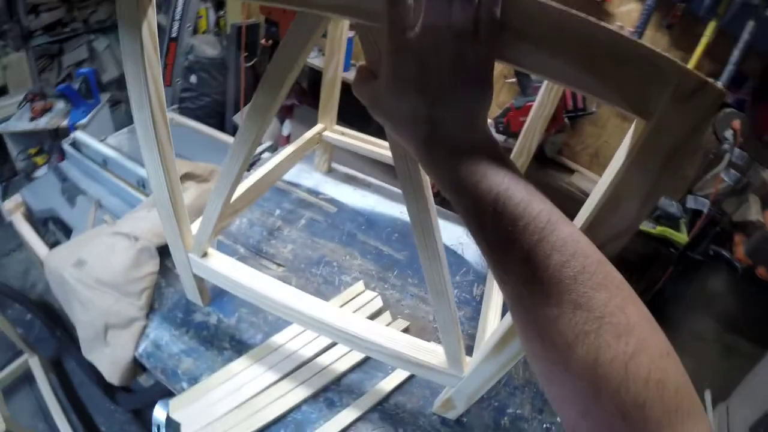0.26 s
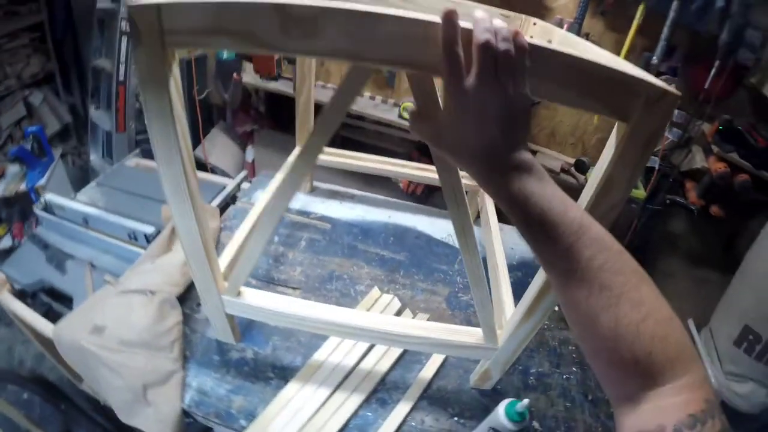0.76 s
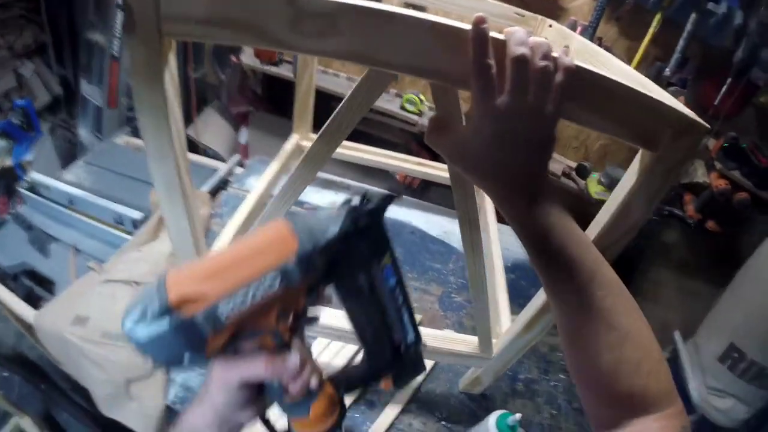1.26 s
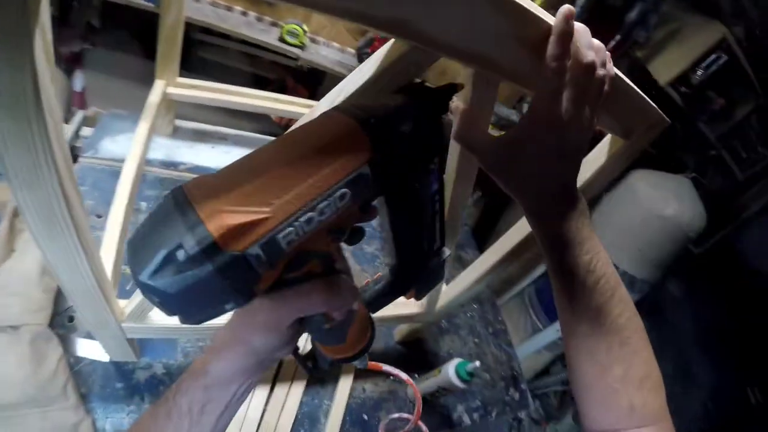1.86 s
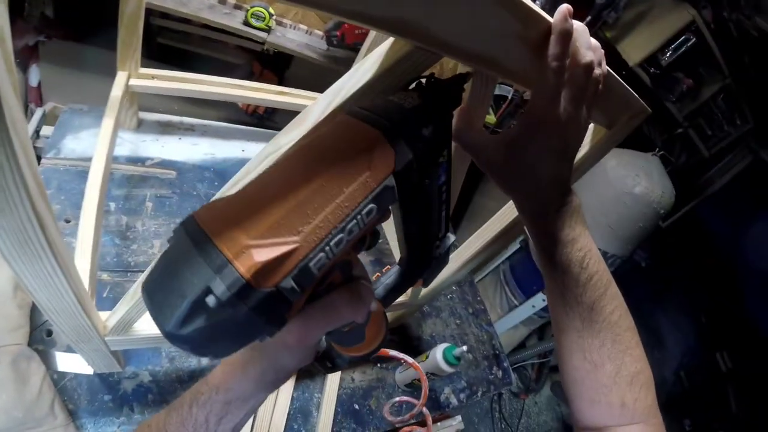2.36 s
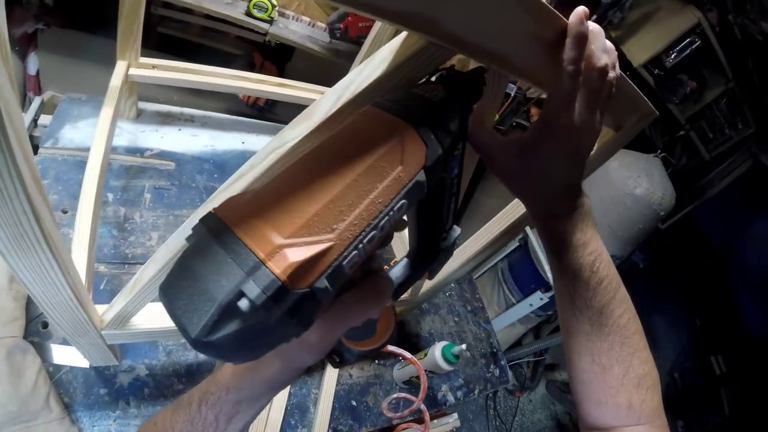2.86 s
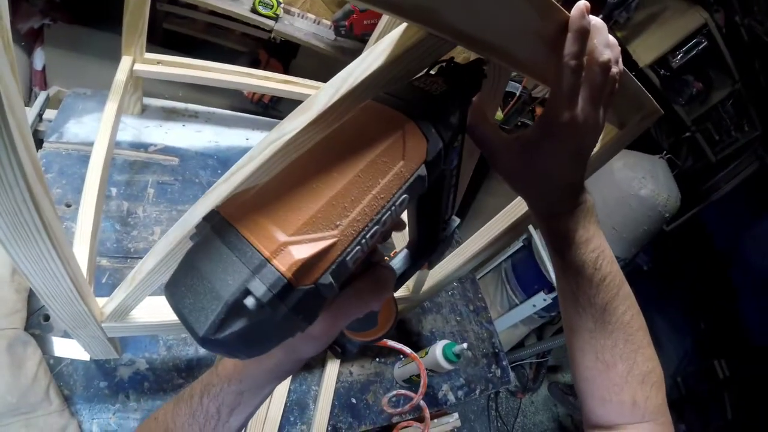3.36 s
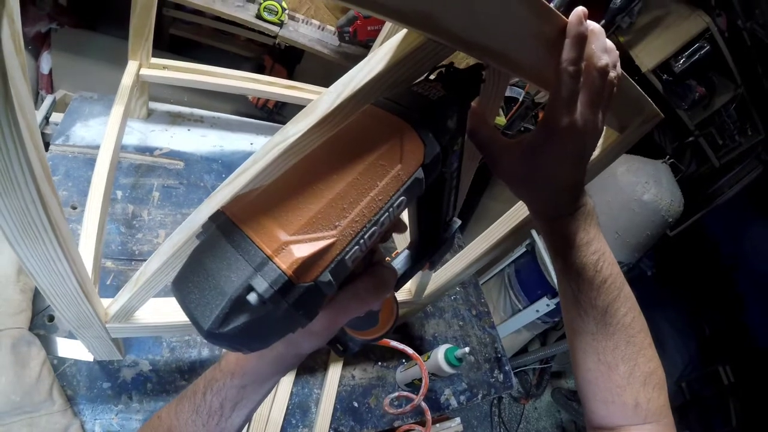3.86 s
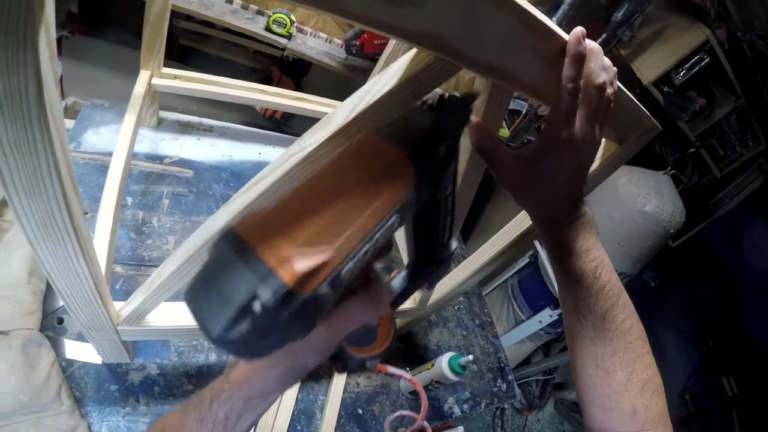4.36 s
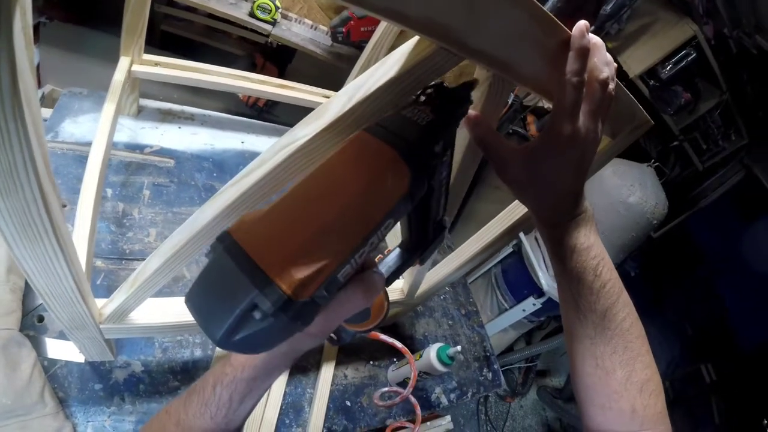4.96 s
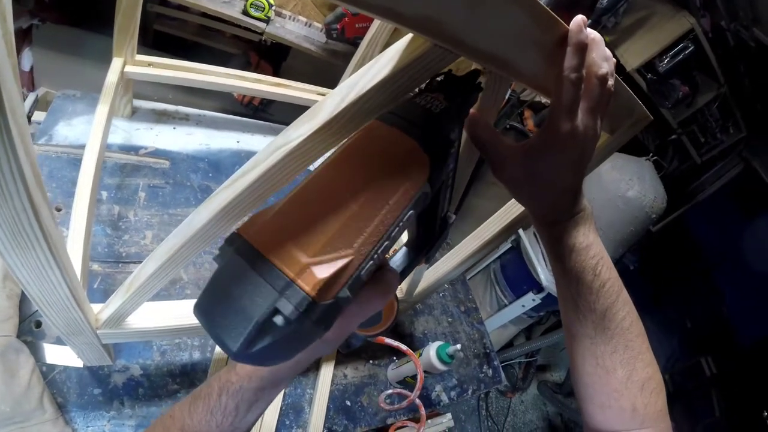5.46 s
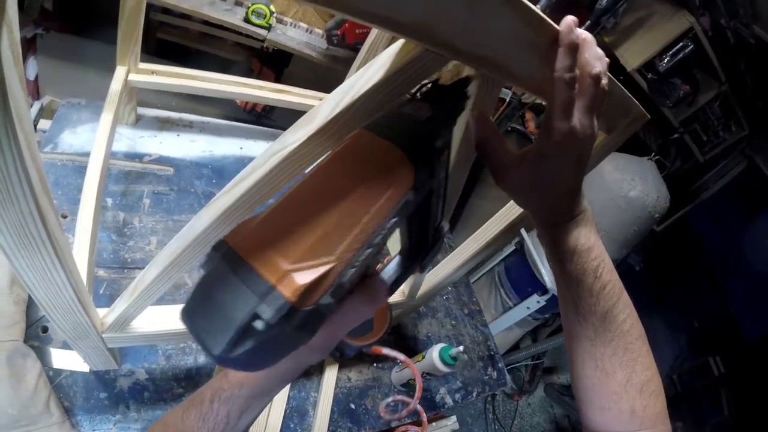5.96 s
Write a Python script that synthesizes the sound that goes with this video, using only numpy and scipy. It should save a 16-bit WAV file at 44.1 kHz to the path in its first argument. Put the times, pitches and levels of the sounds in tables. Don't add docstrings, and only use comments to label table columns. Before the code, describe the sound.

Quiet rubbing and ticks on a wooden frame, a sudden cracking brad nailer shot with chattering exhaust, then sparse metallic clicks over subdued rumble.

```python
import sys
import numpy as np
from scipy import signal
from scipy.fft import rfft, irfft, next_fast_len
from scipy.io import wavfile
from scipy.ndimage import map_coordinates

SR = 44100
rng = np.random.default_rng(int(sys.argv[2]) if len(sys.argv) > 2 else 0)


def attenuation_scalar(level_db):
    decades = np.asarray(level_db, float) / 20
    return 10 ** decades


def transcribe(signal):
    frames = np.atleast_2d(signal).T
    limited = np.clip(frames, -1, 1)
    pcm = np.round(limited * 32767).astype(np.int16)
    wavfile.write(sys.argv[1], SR, pcm)


N = 273420


def unit(x):
    return x / np.sqrt(np.mean(x ** 2) + 1e-20)


def along(points, hz):
    point_hz, value = np.transpose(points)
    return np.interp(np.log(hz + 1), np.log(point_hz + 1), value)


def wobble(rate_hz):
    knots = rng.standard_normal(int(N * rate_hz / SR) + 4)
    return map_coordinates(knots, [np.arange(N) * rate_hz / SR])


def filtered(x, response):
    size = next_fast_len(N)
    gain = attenuation_scalar(along(response, np.fft.rfftfreq(size, 1 / SR)))
    return irfft(rfft(x, size) * gain, size)[:N]


def noise(spectrum):
    return unit(filtered(rng.standard_normal(next_fast_len(N)), spectrum))


def ring(modes, t, scatter_db, shorten=1):
    total = 0
    for hz, db, t60 in modes:
        decay = attenuation_scalar(db + rng.normal() * scatter_db - 60 * t / (t60 * shorten))
        total = total + decay * np.sin(2 * np.pi * hz * t)
    return total


def add(track, start_s, sound):
    part = track[round(start_s * SR):][:len(sound)]
    part += sound[:len(part)]


def bursts(rows, bright_colour, dull_colour, rise_s, flutter_db):
    t = np.arange(SR // 2) / SR
    bright_power, dull_power = np.zeros(N), np.zeros(N)
    for start_s, db, hold_s, t60, dull_db in rows:
        fall_db = 60 * np.clip(t - rise_s - hold_s, 0, 1) / t60
        flow = np.clip(t / rise_s, 0, 1) ** 2 * attenuation_scalar(db - fall_db)
        add(bright_power, start_s, flow ** 2)
        add(dull_power, start_s, (attenuation_scalar(dull_db) * flow) ** 2)
    flutter = unit(attenuation_scalar(flutter_db * wobble(500)))
    bright = np.sqrt(bright_power) * noise(bright_colour)
    return flutter * (bright + np.sqrt(dull_power) * noise(dull_colour))


# start_s [s], level_db [dB rms], hold_s [s], t60_s [s], dull_db [dB]
INLET = [
    (4.0665, -12, 0.00088, 0.023, -7.5),
    (4.0645, -18, 0.04, .03, -12),
]
# start_s [s], level_db [dB rms], hold_s [s], t60_s [s], dull_db [dB]
STRIKE = [
    (4.0975, -15.5, 0.0011, 0.018, 0),
    (4.0995, -12, 0.0032, 0.01, -1.8),
    (4.104, -22.5, 0.0034, 0.014, -2),
]
# start_s [s], level_db [dB rms], hold_s [s], t60_s [s], dull_db [dB]
EXHAUST = [
    (4.104, -33, .005, 0.24, -0.5),
    (4.2238, -29, .004, .03, -11),
    (4.229, -24.5, .002, .025, -11.5),
    (4.2443, -9, 0.01, .06, -12.5),
    (4.26, -25, 0.009, .25, -14.5),
    (4.275, -29.5, 0.0038, 0.021, 0.5),
    (4.29, -43, 0.071, 0.14, -14),
]
# pitch_hz [Hz], level_db [dB per Hz]
NOZZLE = [(2710, -39.5), (4600, -16), (5540, -3), (9960, -0.5), (11300, -13), (14500, -26), (15300, -32),
          (15700, -51)]
# pitch_hz [Hz], level_db [dB per Hz]
CYLINDER = [(350, -46), (600, -18.5), (1670, -13.5), (1810, -3), (2050, -15), (2260, 3), (2760, -10.5),
            (3530, -6), (4300, -19), (5590, -45.5), (9460, -120)]
# pitch_hz [Hz], level_db [dB per Hz]
WOOD = [(290, -32.5), (500, -2), (1670, -10.5), (2130, -14.5), (2660, -5.5), (3110, -12), (4600, -22),
        (5980, -46), (10100, -120)]
# pitch_hz [Hz], level_db [dB per Hz]
BRIGHT = [(2060, -47.5), (3500, -15), (4250, -20.5), (5570, -5.5), (6170, -7), (7680, 1), (10100, -9),
          (10600, -16), (11700, -29), (14300, -28), (15700, -36)]
# pitch_hz [Hz], level_db [dB per Hz]
DULL = [(290, -34), (500, -3), (554, -5.5), (642, -7.5), (1200, -3.5), (1920, -8.5), (2590, -4),
        (3510, -13), (4600, -35.5), (5980, -43.5), (10100, -120)]


def air():
    fill = bursts(INLET, NOZZLE, CYLINDER, rise_s=0.0032, flutter_db=1.5)
    strike = bursts(STRIKE, NOZZLE, WOOD, rise_s=0.0011, flutter_db=1.0)
    exhaust = bursts(EXHAUST, BRIGHT, DULL, rise_s=0.0047, flutter_db=0.9)
    return fill + strike + exhaust


# start_s [s], level_db [dB peak], contact_s [s], ring_length [0-1]
BLOWS = [
    (4.067, -15, 0.0019, 0.86),
    (4.0993, -4, 0.00078, 0.4),
    (4.1116, -14.5, .002, 0.5),
    (4.1215, -13.5, .002, .6),
    (4.152, -22.5, .002, .8),
    (4.182, -26, .0025, .9),
    (4.2338, -20.5, .002, .15),
    (4.2444, -7.5, .0009, .15),
]
# start_s [s], level_db [dB peak]
BUMPS = [(.68, -37), (.7, -32.5), (.995, -35.5), (1.145, -38), (1.245, -40), (1.745, -31.5), (1.76, -34),
         (1.8, -37), (1.825, -38.5), (4.859, -33.5), (4.89, -39.5), (4.93, -42), (5.295, -37),
         (5.345, -38.5), (5.385, -39.5), (5.555, -37), (5.745, -39), (6.155, -34.5)]
# pitch_hz [Hz], level_db [dB], t60_s [s]
FRAME = [(166, 0, 0.14), (218, -0.5, 0.14), (266, 2.5, 0.052), (311.3, -8.5, 0.13), (391.5, -4, .15),
         (540, -17, .03), (960, -16, 0.025)]


def frame():
    out, t = np.zeros(N), np.arange(SR // 3) / SR
    chatter = [(4.2558 + k * 0.0112, -8 - 2.1 * k ** 2, 0.002, 0.46) for k in range(6)]
    bumps = [(start_s, db, 0.0014, 0.7) for start_s, db in BUMPS]
    for start_s, db, contact_s, ring_length in BLOWS + chatter + bumps:
        push = np.hanning(int(contact_s * SR) + 3)
        ringing = np.convolve(ring(FRAME, t, 1.5, ring_length), push / push.sum())
        add(out, start_s + contact_s / 2, attenuation_scalar(db - 8.5) * ringing)
        add(out, start_s, -attenuation_scalar(db - 7.5) * push)
    return out


# start_s [s], level_db [dB peak], dull_db [dB], steel_hz [Hz], housing_hz [Hz]
CLICKS = [(0.0955, -30, -11, 7040, 931), (0.108, -32, -19, 6500, 1540), (2.0072, -33, -6, 4900, 1700),
          (2.2775, -28.5, -1, 9600, 1570), (2.2867, -37, 8, 4400, 930), (2.569, -40, -4.5, 6830, 2270),
          (2.6475, -22.5, -21, 8600, 2200), (2.654, -32, -25, 8450, 2200), (3.9238, -42, 6.5, 7800, 920),
          (4.6187, -30, -4, 8500, 897), (4.8619, -28.5, -3, 8540, 2693), (5.0504, -22.5, -6.5, 7900, 2564),
          (5.8895, -15.5, -1.5, 5600, 2800), (5.9618, -16.5, -7, 8010, 2200),
          (5.9684, -37, 1.5, 7580, 2190), (6.1605, -38, -0.5, 6700, 1360)]
# start_s [s], level_db [dB peak], dull_db [dB]
TICKS = [(.9756, -42, 3.5), (1.7495, -51, 13), (1.7928, -41, -14), (1.9016, -42, -21),
         (2.1172, -40.5, -0.5), (2.369, -56, 9), (2.445, -58, 9), (2.6728, -46, 0), (2.994, -41.5, -6),
         (4.0125, -50, 0), (4.042, -35, -10), (5.257, -50, -12), (5.2942, -46, 4), (5.308, -52, 8),
         (5.3687, -46, -9.5), (5.556, -53, 8), (5.7444, -52, 9)]
# start_s [s], level_db [dB peak], dull_db [dB]
RATTLES = [
    (4.6297, -36, -3),
    (4.872, -43, 3),
    (5.047, -45, 2),
    (5.8846, -29.5, -8),
    (5.903, -40, 7),
]
# pitch_hz [Hz], level_db [dB], t60_s [s]
METAL = [(5280, -6, .02), (6830, -2, 0.045), (7350, -11, .03), (8450, -3.5, 0.04), (9800, -6, 0.024)]
# pitch_hz [Hz], level_db [dB], t60_s [s]
BODY = [(955, -2, 0.024), (1620, 3.5, 0.013), (2190, 0.5, 0.026), (2870, 4.5, 0.017), (3380, 0.5, 0.013),
        (4240, -1.5, .012)]


def clicks():
    out, t = np.zeros(N), np.arange(SR // 6) / SR
    bright, dull = noise(BRIGHT), noise(DULL)
    onset = np.clip(t / 0.001, 0, 1) ** 2
    contacts = [(0.021, *row) for row in CLICKS]
    for t60, rows in ((0.018, TICKS), (0.033, RATTLES)):
        contacts += [(t60, *row, rng.uniform(6500, 9100), rng.uniform(900, 2760)) for row in rows]
    for t60, start_s, db, dull_db, steel_hz, housing_hz in contacts:
        crack = 0.46 * attenuation_scalar(-60 * t / 0.0038) + attenuation_scalar(-60 * t / t60) + 0.1 * attenuation_scalar(-60 * t / (4 * t60))
        at = rng.integers(N - len(t))
        steel_ring = ring(METAL + [(steel_hz, 8, .03)], t, 2.5, shorten=t60 / 0.045)
        housing_ring = ring(BODY + [(housing_hz, 6, .018)], t, 1.0, shorten=t60 / 0.017)
        steel = crack * bright[at:at + len(t)] + 0.45 * steel_ring
        housing = crack * dull[at:at + len(t)] + 0.46 * housing_ring
        add(out, start_s + .0004, attenuation_scalar(db - 6) * onset * (steel + attenuation_scalar(dull_db) * housing))
    return out


# peak_s [s], level_db [dB peak], swell_s [s], fade_s [s], dull_db [dB]
SCUFFS = [(.055, -47, 0.028, 0.11, -21), (0.104, -40.5, 0.11, 0.073, -5), (.256, -48, 0.027, 0.17, 0),
          (.7, -50.5, 0.09, 0.13, 4.5), (.83, -49.5, 0.05, 0.066, 4), (.866, -45.5, 0.09, 0.099, 1.5),
          (1.0, -61, .04, 0.11, 8.5), (1.15, -62.5, 0.47, 0.44, 6), (1.312, -39, 0.023, 0.075, -2),
          (1.332, -36, 0.035, 0.068, -6), (1.79, -55.5, 0.2, 0.3, 1.5), (1.9, -59, .02, .15, -2),
          (5.3, -62, .02, 0.064, 10), (5.356, -64, .02, 0.073, 6), (6.09, -59, .01, 0.024, 7),
          (6.158, -58, 0.054, .08, 4)]
# pitch_hz [Hz], level_db [dB per Hz]
SKIN = [(240, -35.5), (400, -4), (610, -6), (723, -4.5), (920, -2.5), (1520, -1), (1750, -3), (3070, -12),
        (4400, -27), (5720, -54), (9680, -120)]


def scuffs():
    t, bright_power, dull_power = np.arange(N) / SR, np.zeros(N), np.zeros(N)
    for peak_s, db, swell_s, fade_s, dull_db in SCUFFS:
        distance = np.maximum((peak_s - t) / swell_s, (t - peak_s) / fade_s)
        power = attenuation_scalar(db - 22 * distance) ** 2
        bright_power += power
        dull_power += power * attenuation_scalar(dull_db) ** 2
    grain = unit(attenuation_scalar(1.6 * wobble(400)))
    return grain * (np.sqrt(bright_power) * noise(BRIGHT) + np.sqrt(dull_power) * noise(SKIN))


# start_s [s], pitch_hz [Hz], level_db [dB], length_s [s]
SQUEAKS = [(.38, 1380, -61, .3), (.68, 700, -50, .05), (.685, 1600, -56, .06), (.71, 1030, -54, .05),
           (.75, 980, -58, .07), (.8, 1000, -52, .06), (.85, 1150, -55, .05), (.995, 1650, -55, .04),
           (1.235, 2550, -61, .19), (1.305, 1500, -50, .05), (1.8, 2450, -63, .08), (1.895, 2800, -63, .04),
           (1.925, 2250, -61, .05), (1.98, 2200, -62, .04), (2.56, 2400, -63, .1), (2.675, 2200, -61, .08)]


def squeaks():
    out = np.zeros(N)
    waver, grip = 1 + .02 * wobble(120), attenuation_scalar(2 * wobble(90))
    for start_s, hz, db, length_s in SQUEAKS:
        span = slice(round(start_s * SR), round((start_s + length_s) * SR))
        turns = np.cumsum(hz * waver[span]) / SR
        swell = np.hanning(len(turns)) ** .5
        add(out, start_s, attenuation_scalar(db + 3.5) * swell * grip[span] * np.sin(2 * np.pi * turns))
    return out


# pitch_hz [Hz], t60_s [s]
SHOP = [(200, 0.21), (2000, .3), (10000, 0.15)]


def shop(x):
    hz, t, z = signal.stft(rng.standard_normal(SR // 2), SR, nperseg=256)
    decay = attenuation_scalar(-60 * t / along(SHOP, hz)[:, None])
    tail = signal.istft(z * decay, SR, nperseg=256)[1]
    delayed = np.pad(x, (250, 0))
    return signal.fftconvolve(delayed, tail / np.linalg.norm(tail))[:N]


# pitch_hz [Hz], level_db [dB per Hz]
RUMBLE = [(12, -51), (20, -16.5), (58, -19), (103, -34.5), (129, -8), (153, 1.5), (266, -4.5), (326, -6.5),
          (384, -8), (417, -9.5), (453, -10), (1720, -20), (2700, -25), (3510, -56), (5940, -120)]
# pitch_hz [Hz], level_db [dB per Hz]
HISS = [(1760, -34), (3000, -3), (3600, -6), (4100, -13), (4700, -14), (5300, -6), (6000, -5), (6660, 1),
        (8850, 0), (11400, -7), (15250, -12), (15400, -60)]


def hum():
    duck_s, fall_s, duck_db, release_s, recover_db_per_s = 4.07, .3, -9.5, 4.63, 12
    back_s = release_s - duck_db / recover_db_per_s
    times_s = [duck_s, duck_s + fall_s, release_s, back_s]
    gain_db = np.interp(np.arange(N) / SR, times_s, [0, duck_db, duck_db, 0])
    rumble = attenuation_scalar(-50 + 0.83 * wobble(8.3)) * noise(RUMBLE)
    hiss = attenuation_scalar(-61.5 + 0.36 * wobble(14)) * noise(HISS)
    return attenuation_scalar(gain_db) * (rumble + hiss)


# pitch_hz [Hz], level_db [dB]
WIND_CUT = [(20, -23), (90, -27.5), (112, -29), (135, -5), (160, 0), (15300, -1), (15900, -33.5)]


def scene():
    shot, taps = air() + frame(), clicks()
    near = shot + taps + attenuation_scalar(-15.5) * shop(shot) + attenuation_scalar(-16.0) * shop(taps) + scuffs() + squeaks()
    near = near / (1 + np.abs(near / 1.08) ** 6) ** (1 / 6)
    return (filtered(near, WIND_CUT) + hum())[None]


def band_limit(x):
    return signal.sosfilt(signal.butter(12, 15890, fs=SR, output="sos"), x)


# start_s [s], end_s [s], fade_s [s]
DROPOUT = (6.0555, 6.07, .016)


def record(dry):
    start_s, end_s, fade_s = DROPOUT
    t = np.arange(N) / SR
    gate = np.where(t < start_s, 1, np.clip((t - end_s) / fade_s, .001, 1))
    mix = np.clip(dry * gate, -1, 1)
    return band_limit(mix)


dry = scene()
out = record(dry)
transcribe(out)
```